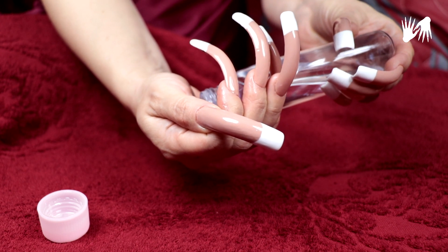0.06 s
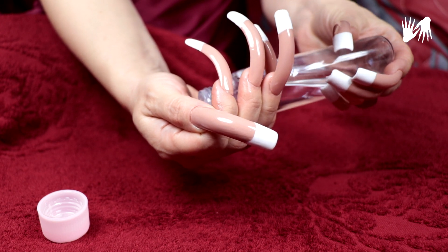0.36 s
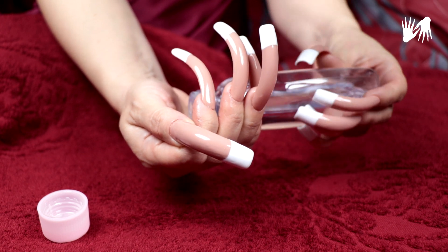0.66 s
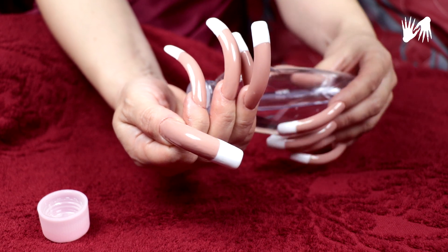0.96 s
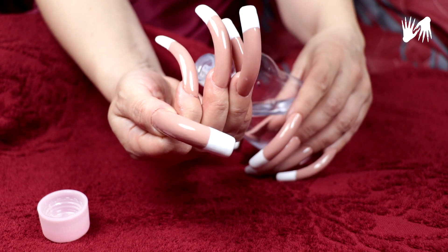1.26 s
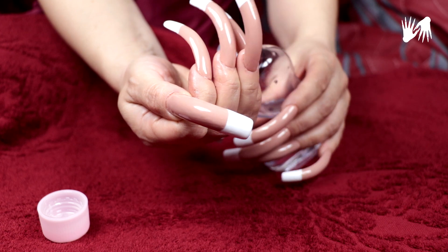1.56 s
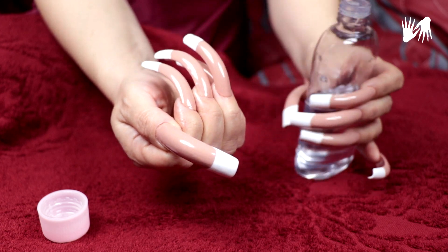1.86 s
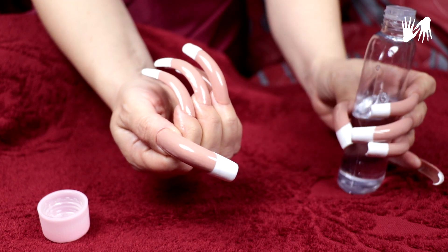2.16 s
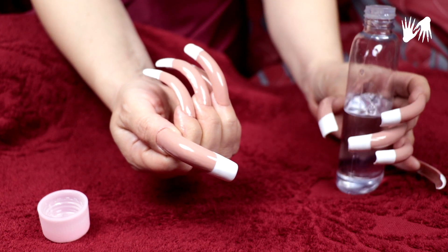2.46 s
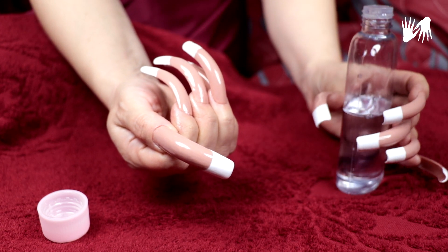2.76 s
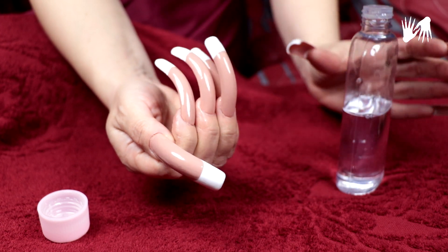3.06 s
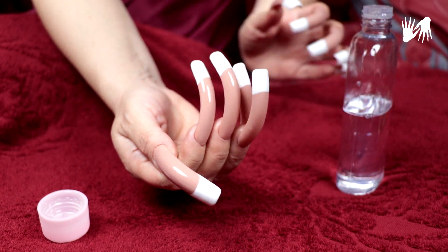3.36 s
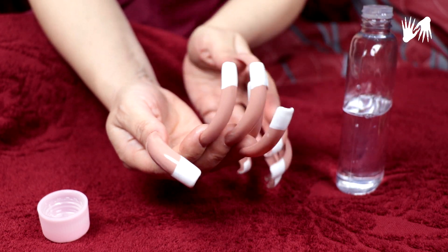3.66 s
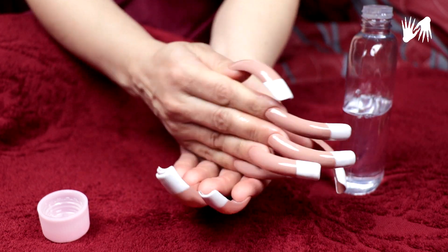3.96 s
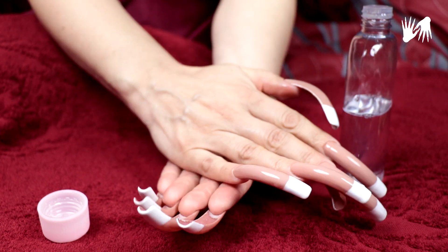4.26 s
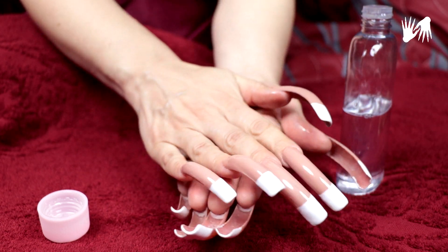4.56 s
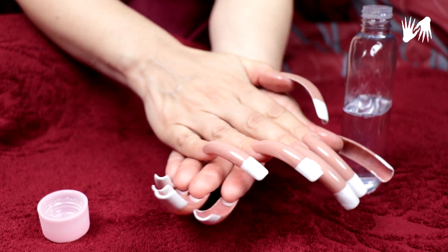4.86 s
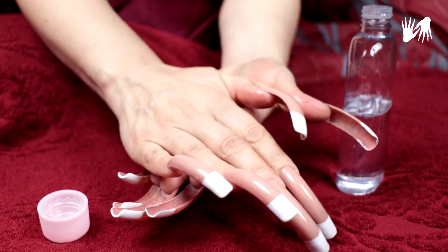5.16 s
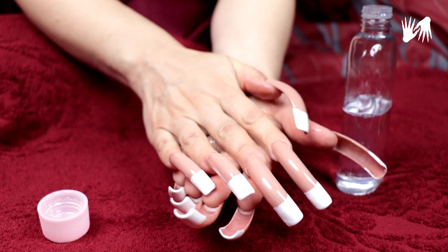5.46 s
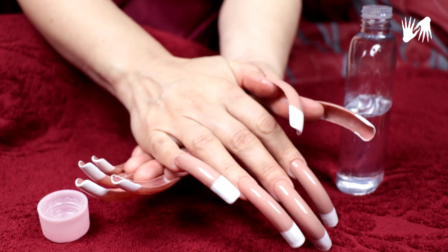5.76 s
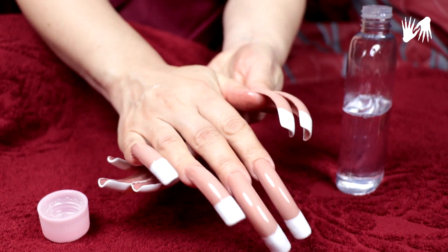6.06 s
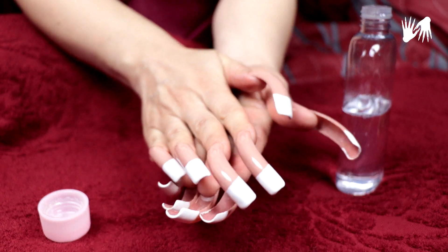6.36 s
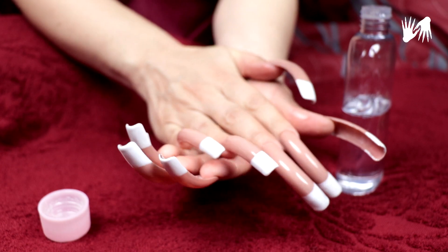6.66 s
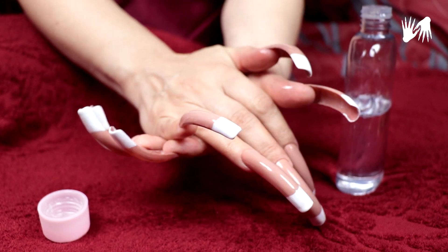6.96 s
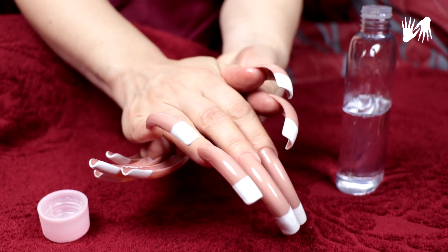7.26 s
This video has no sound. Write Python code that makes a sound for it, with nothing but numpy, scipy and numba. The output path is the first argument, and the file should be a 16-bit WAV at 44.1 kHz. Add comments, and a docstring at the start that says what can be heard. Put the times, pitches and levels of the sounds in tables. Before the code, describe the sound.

From about 0.5 to 0.9 seconds, long nails tap a plastic oil bottle in a quick cluster, mostly on the right: hard ticks with short hollow rings, the loudest sounds here. Skin then drags faintly over the bottle as it turns, with low rumbling and a soft knock near 1.6 seconds. Around 2 seconds it settles on a blanket with a dull scuff and a few lighter taps. A lull follows, with faint brushing and nail clicks just after 3 seconds.

From about 3.7 seconds, oiled palms slide over each other near the centre in repeated soft swishes, slightly raspy, with airy whistles gliding between the fingers. Nails click together irregularly, most sharply around 4 seconds, and occasional low thuds accompany the strokes. The rubbing eases off by about 7.4 seconds. Everything is close to a stereo microphone in a quiet, dead room with faint hiss.

```python
"""Long nails tap a plastic oil bottle, each tap a hard tick and a short hollow ring.
Skin drags over the bottle as it is turned upright and stood on a blanket, with soft knocks.
Then oiled palms slide over each other: skin swishes, the finger gaps whistle, the air pocket
between the hands rings and glides, and the nails click together.
Heard from close by, on a stereo microphone in a quiet, dead room."""
import sys
import numpy as np
from scipy import signal
from scipy.fft import rfft, irfft, next_fast_len
from scipy.io import wavfile
from scipy.ndimage import uniform_filter1d
from numba import njit

SR = 44100
rng = np.random.default_rng(int(sys.argv[2]) if len(sys.argv) > 2 else 0)


def wav_record(signal):
    """Record a signal, one row per channel, as 16-bit PCM in the file named by sys.argv[1]."""
    frames = np.transpose(np.atleast_2d(signal))
    bounded = np.clip(frames, -1, 1)
    # unit amplitude maps onto the largest positive 16-bit level
    quanta = np.round(bounded * 32767).astype(np.int16)
    wavfile.write(sys.argv[1], SR, quanta)


N = 322812
T = np.arange(N) / SR

# Nails on the bottle, mostly right of the microphone. Each row: start in seconds, level in dB,
# favoured pitch in Hz, relative clack and treble in dB, pan (left minus right) in dB.
BOTTLE_TAPS = [(0.55, -25, 620, -11, -5, -8), (0.589, -37.5, 540, -7, -17, -9),
               (0.645, -59, 533, -23, -13, -16), (0.681, -46, 656, -22, -27, -14),
               (0.698, -24, 1300, -21.5, -19, -8.5), (0.702, -31, 900, -15, -15, -7),
               (0.739, -46, 1350, -29, -7, 9), (0.757, -20.5, 845, -17, -5, -10),
               (0.801, -32, 794, -16, -12, -7), (0.819, -26.5, 790, -16.5, -5, -9),
               (0.836, -40, 816, -18, -8, 4), (0.867, -40.5, 1390, -7, -8, -10),
               (0.884, -41.5, 654, -17, -0.5, -2), (0.902, -44.5, 832, -15, -22, -9),
               (2.188, -37, 850, -10.5, -16, -12), (2.255, -49, 829, -10, -7, -17),
               (2.293, -48, 834, -12, -6, -15), (3.334, -55, 690, -12, -11, -12)]
# Modes of the bottle with oil in it. Each row: pitch in Hz, relative level in dB, t60 in seconds.
BOTTLE_MODES = [(211, -18, 0.2), (347, -17, 0.13), (511.6, -7.5, 0.052), (684, 1.5, 0.022),
                (847, -3, 0.042), (994, -8.5, 0.063), (1042, -3, 0.026), (1296, -5, 0.051),
                (1493, -1, 0.033), (1970, -8, 0.048), (2090, -11, 0.035), (2600, 0, 0.024),
                (3310, -2.5, 0.017), (4240, -9.5, 0.03)]
# Palm over palm. Each row: fastest moment, rise and fall in seconds, level in dB, relative whistle
# in dB, its drop in octaves per half stroke, relative rasp and air pocket in dB,
# pocket pitch in Hz at the start, the fastest moment and the end, pan in dB.
PALM_STROKES = [(3.6, 0.095, 0.11, -73, -12, 0, 7.5, -6, 2300, 2000, 2000, -15),
                (3.8, 0.18, 0.086, -59, -12, 0, -2, -17, 2600, 2300, 2500, -10),
                (3.9, 0.097, 0.3, -52.5, -10, 0.14, 2, -14, 2200, 1830, 1850, -3),
                (4.29, 0.19, 0.23, -50, 7, 0.3, -4.5, -13, 2900, 1270, 5800, 0.5),
                (4.39, 0.12, 0.072, -60.5, -14, 0.12, -7, 2, 4200, 4300, 3200, -1),
                (4.6, 0.11, 0.1, -47, -6.5, 0, -6, -11.5, 4730, 3250, 2300, 0.5),
                (4.71, 0.077, 0.061, -52.5, 3.5, 0.074, -3, -8, 2620, 2800, 3100, -1.5),
                (4.94, 0.18, 0.16, -50.5, 3, 0.13, -4, -5, 6000, 4360, 3400, 0),
                (5.08, 0.1, .2, -51.5, -7, 0.39, -8, -14, 3600, 4100, 4300, 1),
                (5.19, 0.044, 0.067, -59.5, -9, 0, -12, -24, 4000, 3900, 3800, 6),
                (5.37, 0.12, 0.13, -50.5, -7, 0, -6, -11, 4080, 3200, 2300, .5),
                (5.66, 0.18, 0.13, -53, -3, 0, -2, -7, 4300, 3630, 4000, 2),
                (5.79, 0.097, 0.15, -53.5, -4, 0.2, -11, -14.5, 3400, 3560, 5500, 1.5),
                (5.99, 0.15, 0.12, -58, -6, 0, -16, -24, 5000, 11000, 7000, 2.5),
                (6.24, 0.087, 0.066, -56, 4.5, .5, -6, -12, 3200, 2800, 2900, -1),
                (6.37, 0.14, 0.14, -51, -12, 0.15, -2.5, -12.5, 2610, 2400, 2400, -0.5),
                (6.5, 0.066, 0.073, -57, 3, 0.12, 2, -9, 2400, 2340, 2400, 0),
                (6.66, 0.076, 0.11, -60, 6.5, 0, 5, -4.5, 2200, 2340, 3600, 1),
                (6.8, 0.11, .14, -53.5, 2.5, 0, 1, -4, 3000, 3900, 5100, 1),
                (7.07, 0.2, .18, -58, -1, 0, -1.5, -6.5, 4070, 3500, 2700, .5),
                (7.33, 0.07, .15, -68, 7, 0.058, -7, 5.5, 2930, 3050, 2400, 0)]
# Tone of oiled skin, bright swish and lower rasp. Each row: frequency in Hz, gain in dB.
SWISH_SPECTRUM = [(400, -30), (1000, -11), (2000, -10.5), (3200, -13.5), (4500, -2), (6000, 0.5),
                  (8000, 7.5), (10000, -4), (12000, -3), (14000, -1), (15800, -13)]
RASP_SPECTRUM = [(300, -2), (600, -4), (1000, -4.5), (1600, -2), (2500, 2), (3500, 5.5), (6000, -1)]
# Murmur of cupped hands. Each row: strongest moment, rise and fall in seconds, level in dB.
CUPPED_SWELLS = [(4.68, .45, .9, -67)]
# Sharp clicks of nails, on each other or on the bottle. Each row: start in seconds,
# relative body and treble in dB, lower and upper ring in Hz, pan in dB.
NAIL_CLICKS = [(0.487, -54.1, -74, 2900, 7670, -11), (2.1015, -57.5, -54.5, 4100, 6300, -10),
               (2.1881, -42, -43, 2260, 9950, -13.5), (3.1265, -42.5, -39.5, 2230, 4940, 2.5),
               (3.3695, -52.5, -52, 3200, 4900, -6), (3.4756, -75, -50.5, 1790, 9100, 5),
               (3.8591, -46.5, -29, 3620, 6760, 8), (3.8837, -51, -44, 3100, 5900, 9),
               (4.0375, -36.5, -32.5, 1820, 9260, 8.5), (4.0415, -40, -54, 3230, 9260, -16),
               (4.0697, -38.5, -27.5, 3350, 8060, -6), (4.5126, -54, -51, 2640, 6070, 8),
               (4.588, -37.5, -55, 3630, 8230, -11), (4.882, -42.5, -57, 2070, 7500, -2),
               (5.2092, -48.5, -62, 2110, 8200, 5), (5.385, -42.5, -47, 2430, 9100, 10),
               (5.3993, -44, -43, 2300, 6070, 4), (5.4052, -45, -40.5, 1950, 8000, 10),
               (5.5676, -42.5, -59, 2450, 7670, 7), (5.9512, -78, -44.5, 3660, 8650, -27),
               (6.155, -51, -54, 2320, 7540, 2), (6.1835, -53, -51, 2340, 5510, 8),
               (6.207, -47.5, -43.5, 3490, 8900, 6), (6.253, -53, -39.5, 2580, 6800, 8),
               (6.3532, -45, -61, 2400, 7750, 3), (6.876, -48, -56, 3160, 8610, 3),
               (6.899, -50.5, -63, 1670, 7190, 3), (7.0963, -52, -42, 4070, 6600, -1)]
# Knocks of hands and bottle. Each row: start in seconds, level in dB, centre pitch in Hz,
# relative slap in dB.
SOFT_KNOCKS = [(0.931, -46.5, 120, -28), (1.46, -44, 42, -32), (1.577, -37.5, 50.6, -12),
               (1.656, -34.5, 40.4, 9), (2.065, -46, 86, -25), (4.038, -39.5, 38, -23),
               (4.067, -41, 35.8, -26), (5.166, -40.5, 59.6, -31), (5.906, -40.5, 53.5, -32),
               (7.214, -37.5, 81, -18)]
# Skin dragging on the bottle. Each row: fastest moment, rise and fall in seconds,
# then relative hiss, finest hiss and hollow ring in dB.
GRIP_DRAGS = [(.78, .3, 0.19, -72, -71, -50.5), (.84, 0.14, 0.15, -63, -69, -46),
              (1.07, 0.26, 0.091, -67, -68, -56.5), (1.21, 0.17, 0.091, -59, -63, -58),
              (1.38, 0.15, 0.12, -64.5, -65.5, -64), (1.49, 0.064, 0.083, -65, -80, -59),
              (1.605, 0.024, 0.025, -62.5, -63, -66), (1.72, 0.22, 0.14, -68.5, -75, -66),
              (1.88, .12, 0.11, -63.5, -71, -71.5), (2.14, 0.23, 0.36, -70.5, -84, -65),
              (3.1, 0.15, 0.22, -66.5, -66.5, -90), (3.27, 0.11, 0.16, -67, -65, -93)]
# On the blanket, the bottle's base scuffs the pile, and arms and bottle shift.
# Each row: strongest moment, rise and fall in seconds, relative level in dB.
BASE_SCUFFS = [(1.95, 0.022, .025, -52.5), (2.06, 0.053, 0.083, -51), (2.14, 0.044, 0.034, -50)]
BLANKET_SHIFTS = [(.4, 0.051, 0.052, -57), (.9, 0.46, 0.36, -54.5), (1.37, 0.065, .08, -59),
                  (1.58, 0.2, 0.26, -49.5), (2.0, 0.6, 0.38, -59), (3.8, 0.34, .3, -67),
                  (5.1, 0.55, .4, -60), (6.0, 0.46, 0.32, -60), (7.23, 0.2, 0.088, -53)]
# Room tone. Each row: frequency in Hz, gain in dB.
ROOM_SPECTRUM = [(20, 6.5), (45, -0.5), (80, -8), (130, -12), (200, -12.5), (350, -17), (600, -21.5),
                 (1000, -25), (2000, -29), (4000, -32), (8000, -34.5), (15500, -37.5)]
# The microphone pair. Each row: frequency in Hz, lead of the left capsule in radians,
# direct sound's share of the power.
MIC_PAIR = [(100, .1, .2), (700, .3, .4), (1400, .4, .7), (2500, .3, .66), (4200, 2, .64), (5800, 1.2, .7),
            (8000, 2.9, .79), (10500, 3.1, .6), (13000, 3.4, .66), (15500, 4.1, .42)]


def bottle_taps(wall_db=9, tick_db=-2, tick_t60=0.012, tail_db=-29, tail_t60=0.29):
    """A nail strikes the plastic close by: a hard tick, a short hollow ring and a faint tail."""
    out, t = np.zeros((2, N)), np.arange(SR // 3) / SR
    tick_spectrum = [(800, -19), (2500, -5.5), (7000, 8), (10000, 2.5), (15000, -13.5)]
    tail_spectrum = [(120, -11.5), (250, -2.5), (800, -19), (1400, -27), (2200, -13.5), (8000, -26.5)]
    for start, db, ring_hz, clack_db, treble_db, pan_db in BOTTLE_TAPS:
        noise = rng.standard_normal((4, len(t)))
        tick = colour(noise[0] * fade(t, tick_t60), tick_spectrum)
        ring = bottle_ring(t, ring_hz, clack_db + wall_db)
        hit = crest(ring) + undb(tick_db + treble_db) * crest(tick)
        tail = undb(tail_db) * unit(colour(noise[2:], tail_spectrum)) * fade(t, tail_t60)
        add(out, start, undb(db) * pan(pan_db) * (mic_pair(hit) + tail))
    return out


def bottle_ring(t, ring_hz, clack_db, focus_db=7, detune=0.031, uneven_db=3.0):
    """The spot struck favours one pitch, a hard blow the upper modes; the grip detunes them."""
    hz, db, t60 = np.transpose(BOTTLE_MODES)[:, :, None]
    favoured = np.exp(-(np.log(hz / ring_hz) / 0.18) ** 2)
    db = db + focus_db * favoured + clack_db * (hz > 1700)
    db = db + uneven_db * rng.standard_normal(hz.shape)
    hz = hz * (1 + detune * rng.standard_normal(hz.shape))
    sign = (-1) ** np.arange(len(hz))[:, None]
    return (sign * undb(db) * damped_sine(t, hz, t60)).sum(axis=0)


def sliding_palms(whistle_db=-1, rasp_db=-1, pocket_db=2, contact_db=-65, flutter_db=1.07):
    """Skin hisses with each stroke's speed; the air pocket rings with it, lower as it deepens."""
    swish = unit(colour(friction(snaps_per_s=530, spread_db=3.5, grain_db=-11), SWISH_SPECTRUM))
    rasp = unit(colour(friction(snaps_per_s=290, spread_db=3.0, grain_db=-6.5), RASP_SPECTRUM))
    drive = friction(snaps_per_s=790, spread_db=3, grain_db=0.5)
    waver = 1 + .03 * wander(45)
    # the narrow gaps between the fingers whistle higher and wander as the fingers shift
    gap_hz = 6100 * (1 + .075 * wander(14))
    # from the first stroke on, the lingering palms keep up a faint hiss
    touching = speed(np.minimum(progress(*PALM_STROKES[0][:3]), 0))
    hands = undb(contact_db) * touching * (swish + undb(-4) * rasp)
    for fastest, rise, fall, db, gap_db, octaves, low_db, ring_db, *pocket_hz, pan_db in PALM_STROKES:
        course = progress(fastest, rise, fall)
        moving = np.flatnonzero(np.abs(course) < 1)
        course = course[moving]
        gaps = cavity(drive[:, moving], gap_hz[moving] * 2 ** (-octaves * course), width=0.4)
        pocket = cavity(drive[:, moving], glide(course, *pocket_hz) * waver[moving], width=.23)
        pace = speed(course)
        skin = (swish[:, moving] + undb(rasp_db + low_db) * rasp[:, moving]) * pace ** 1.13
        whistle = undb(whistle_db + gap_db) * gaps * pace ** 3.3
        ring = undb(pocket_db + ring_db) * pocket * pace ** 0.78
        hands[:, moving] += undb(db) * ((skin + whistle) * pan(pan_db) + ring * pan(-4.5))
    return hands * undb(flutter_db * wander(35))


def cupped_hands():
    """A hollow murmur right of centre while the hands are cupped."""
    hollow = shaped_noise(N, [(200, -34), (400, 4), (540, 6), (750, -10), (1500, -19)])
    return hollow * swells(CUPPED_SWELLS) * pan(-7)


def nail_clicks(low_db=1, high_db=3, mode_db=-7, chatter_db=-17, scatter_db=-10):
    """A stiff nail hits a nail or the bottle: a crack, two damped bending modes, scatter off the hands."""
    out, t = np.zeros((2, N)), np.arange(SR // 16) / SR
    snap = signal.unit_impulse(len(t), 10)
    for start, body_db, treble_db, low_hz, high_hz, pan_db in NAIL_CLICKS:
        noise = rng.standard_normal((4, len(t)))
        # one sharp contact, then a brief chatter of the edges
        contact = snap + undb(chatter_db) * noise[:2] * fade(t, t60=0.01)
        knock = colour(contact[0], [(700, -22), (1500, -2), (3200, 0), (6000, -14)])
        crack = colour(contact[1], [(2000, -20), (5500, 2), (8000, 0), (11000, -2.5), (15500, -4)])
        low = undb(mode_db) * crest(damped_sine(t, low_hz, t60=0.024)) + crest(knock)
        high = undb(mode_db) * crest(damped_sine(t, high_hz, t60=0.018)) + crest(crack)
        hit = undb(low_db + body_db) * crest(low) + undb(high_db + treble_db) * crest(high)
        hit *= t < t[-1] / 2
        reflections = noise[2:] * fade(t, t60=0.023)
        scatter = signal.fftconvolve(hit[None], reflections, axes=1)[:, :len(t)]
        add(out, start, pan(pan_db) * (mic_pair(hit) + undb(scatter_db) * hit.std() * unit(scatter)))
    return out


def soft_knocks(slap_hz=380, body_hz=215, body_db=-17):
    """A fleshy slap sets the hand and bottle rocking for a few cycles."""
    out, t = np.zeros((2, N)), np.arange(SR // 4) / SR
    skew = np.exp([[-.2], [.2]])  # the pushed air reaches the capsules unevenly
    for start, db, hz, slap_db in SOFT_KNOCKS:
        thud = crest(damped_sine(t, hz * skew, t60=0.13))
        pulse = np.cos(2 * np.pi * slap_hz * t) * fade(t, t60=0.0048)
        slap = crest(colour(pulse, [(900, 3), (2500, -24), (6000, 0), (14000, -3)]))
        body = undb(body_db) * damped_sine(t, body_hz, t60=0.14)
        add(out, start, undb(db) * (thud * pan(6.4) + undb(slap_db) * mic_pair(slap + body) * pan(-4)))
    return out


def bottle_turning(hiss_db=-1, ring_db=-3):
    """Skin drags over the bottle, which rings softly in the damping grip."""
    hiss_spectrum = [(1000, -9.5), (2200, 3), (4500, 5), (7500, 4.5), (10000, -12), (15000, -5.5)]
    wall_spectrum = [(120, -27), (200, -3), (550, 0.5), (1000, -18), (1400, -9.5), (2000, -15.5),
                     (5000, -36)]
    drag = friction(snaps_per_s=200, spread_db=-1.5, grain_db=-4)
    hiss = unit(colour(drag, hiss_spectrum))
    # the finest hiss scatters off the hand and reaches the two capsules unrelated
    fine_hiss = shaped_noise((2, N), [(2500, -15), (4500, 5), (8500, 8), (11000, 0), (15000, -6)])
    # the changing grip shifts the main resonance of the bottle
    ring_hz = 780 * (1 + .05 * wander(12))
    ring = unit(np.array([resonate(side, ring_hz, 0.22 * ring_hz) for side in drag]))
    walls = unit(colour(drag, wall_spectrum))
    fastest, rise, fall, *levels = np.transpose(GRIP_DRAGS)
    sliding, brushing, ringing = (swells(zip(fastest, rise, fall, db)) for db in levels)
    skin = hiss * sliding * undb(hiss_db) + fine_hiss * brushing
    bottle = unit(ring + undb(2.5) * walls) * ringing * undb(ring_db)
    return (skin + bottle) * pan(-3.5)


def blanket(rumble_db=-1, restless_db=-64.5):
    """Arms and bottle rumble on the blanket, never quite still; the base scuffs into the pile."""
    rumble = shaped_noise((2, N), [(25, 1.5), (85, 1.5), (140, -5.5), (220, -6.5), (330, -19),
                                   (900, -45)])
    scuff = shaped_noise((2, N), [(60, -14), (88, 6), (135, -13), (175, -0.5), (235, -5.5),
                                  (330, -27), (800, -49)])
    shifting = np.hypot(swells(BLANKET_SHIFTS), undb(restless_db))
    return scuff * swells(BASE_SCUFFS) + rumble * shifting * undb(rumble_db) * pan(2.3)


def room_tone(db=-54):
    """The room behind the hands: steady faint hiss over a low rumble."""
    return undb(db) * shaped_noise((2, N), ROOM_SPECTRUM)


def friction(snaps_per_s, spread_db, grain_db):
    """Stereo skin friction: countless tiny slips, and sparser snaps of the oil film."""
    sizes = undb(spread_db * np.minimum(rng.exponential(size=(3, N)), 5))
    snaps = (rng.random((3, N)) < snaps_per_s / SR) * sizes * rng.choice([-1, 1], (3, N))
    rubbing = rng.standard_normal((3, N)) + undb(grain_db) * unit(snaps)
    return unit(mic_pair(rubbing[0], scatter=rubbing[1:]))


def cavity(drive, hz, width):
    """A steep moving air resonance; width is a share of its centre frequency."""
    hz = np.clip(hz, 100, SR / 3)
    for _ in range(2):
        drive = np.array([resonate(side, hz, width * hz) for side in drive])
    return unit(drive / np.sqrt(hz))


@njit
def resonate(x, hz, width_hz):
    """Band-pass whose centre and width move."""
    y, band_state, low_state = np.empty(len(x)), 0., 0.
    for i in range(len(x)):
        gain, damping = np.tan(np.pi * hz[i] / SR), width_hz[i] / hz[i]
        band = (band_state + gain * (x[i] - low_state)) / (1 + gain * (gain + damping))
        band_state = 2 * band - band_state
        low_state += 2 * gain * band
        y[i] = damping * band
    return y


def mic_pair(x, scatter=None):
    """Sound reaches the left capsule first; the scattered part is unrelated in the two."""
    n = next_fast_len(len(x), True)
    lead, direct = per_bin(MIC_PAIR, n)
    pair = rfft(x, n) * np.exp(.5j * np.array([lead, -lead]))
    if scatter is not None:
        pair = pair * np.sqrt(direct) + rfft(scatter, n) * np.sqrt(1 - direct)
    return irfft(pair, n)[:, :len(x)]


def pan(db):
    """Left and right gains for a level difference; positive is left."""
    gains = undb(np.array([db, -db]) / 2).reshape(2, -1)
    return gains / gains.mean(axis=0)


def progress(fastest, rise, fall):
    """Course of a movement: -1 at its start, 0 at its fastest, 1 at its end."""
    return np.clip((T - fastest) / np.where(T < fastest, rise, fall), -1, 1)


def speed(course):
    """A hand speeds up from rest and slows to rest again."""
    return np.maximum(np.cos(np.pi / 2 * course), 0)


def swells(rows):
    """Gain over time of several movements, whose powers add."""
    return np.sqrt(sum((undb(db) * speed(progress(*timing))) ** 2 for *timing, db in rows))


def glide(course, start_hz, middle_hz, end_hz):
    """A smooth glide through three pitches."""
    start, middle, end = np.log([start_hz, middle_hz, end_hz])
    return np.exp(middle + course * (end - start) / 2 + course ** 2 * ((start + end) / 2 - middle))


def wander(rate_hz):
    """Smooth random drift with a spread near 1."""
    hold = max(int(SR / rate_hz), 2)
    steps = np.repeat(rng.standard_normal(N // hold + 1), hold)
    return 1.3 * uniform_filter1d(steps, hold)[:N]


def damped_sine(t, hz, t60):
    """One mode ringing out."""
    return np.sin(2 * np.pi * hz * t) * fade(t, t60)


def fade(t, t60):
    """Decay by 60 dB in t60 seconds."""
    return np.exp(-np.log(1000) * t / t60)


def shaped_noise(shape, spectrum):
    """Coloured noise of rms 1."""
    return unit(colour(rng.standard_normal(shape), spectrum))


def colour(x, spectrum):
    """Filter by (Hz, dB) points."""
    n = next_fast_len(x.shape[-1], True)
    return irfft(rfft(x, n) * undb(per_bin(spectrum, n)[0]), n)[..., :x.shape[-1]]


def per_bin(table, n):
    """Each column of a table over the frequencies of n samples."""
    hz, *columns = np.transpose(table)
    bin_hz = np.arange(n // 2 + 1) * SR / n
    return [np.interp(np.log(bin_hz + 1), np.log(hz), column) for column in columns]


def undb(db):
    """Decibels to gain."""
    return 10 ** (np.asarray(db) / 20)


def unit(x):
    """Scale to rms 1."""
    return x / np.sqrt(np.mean(x ** 2))


def crest(x):
    """Scale so that the loudest 2 ms have rms 1."""
    return x / np.sqrt(uniform_filter1d(x ** 2, size=88).max())


def add(out, start, x):
    """Mix a stereo sound in at start seconds."""
    i = max(int(start * SR), 0)
    out[:, i:i + x.shape[1]] += x[:, :N - i]


def scene():
    """Bottle and hands close to the microphone, the quiet room behind."""
    strikes = bottle_taps() + nail_clicks() + soft_knocks()
    return strikes + sliding_palms() + cupped_hands() + bottle_turning() + blanket() + room_tone()


def record(dry, top_hz=16000):
    """The recorder cuts the top steeply."""
    return signal.sosfilt(signal.ellip(10, .2, 70, top_hz, fs=SR, output="sos"), dry)


dry = scene()
out = record(dry)
wav_record(out)
```